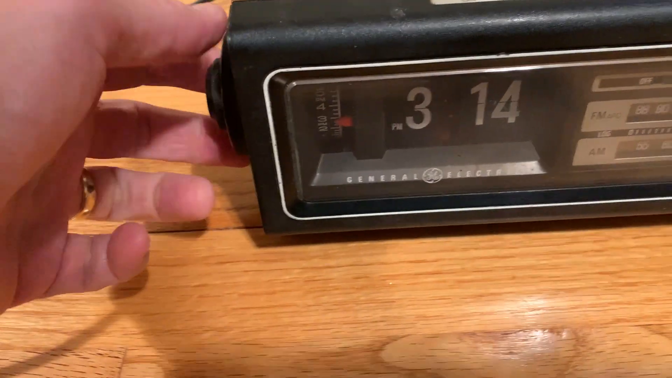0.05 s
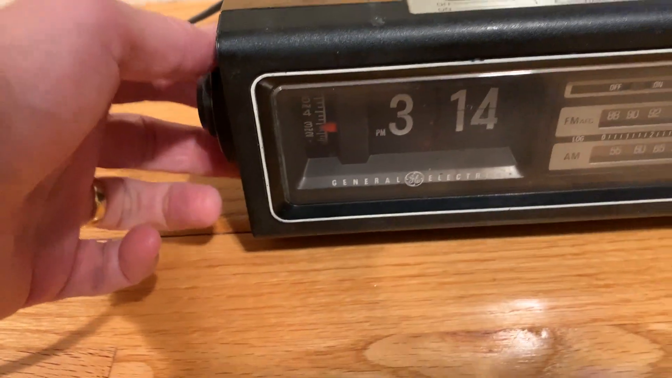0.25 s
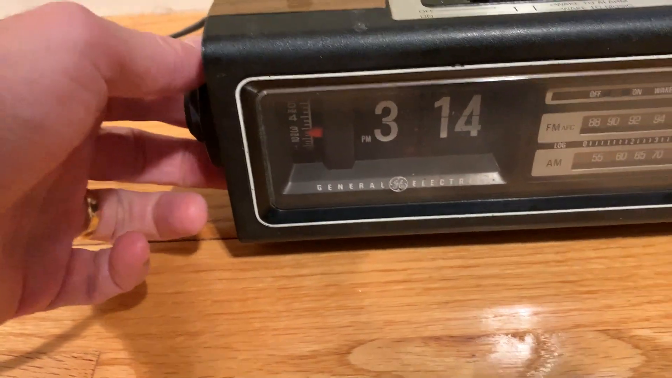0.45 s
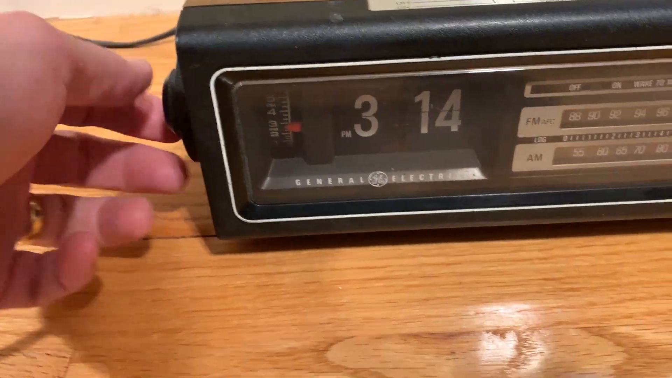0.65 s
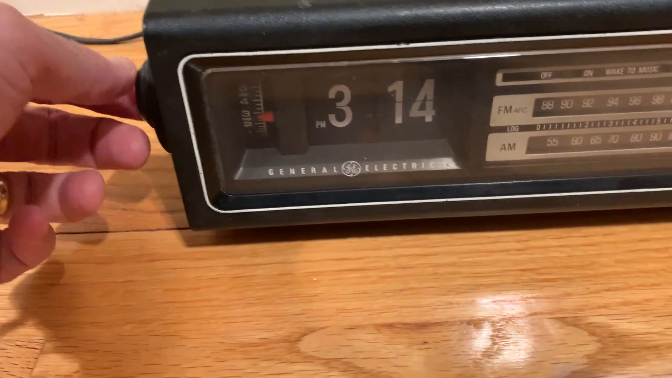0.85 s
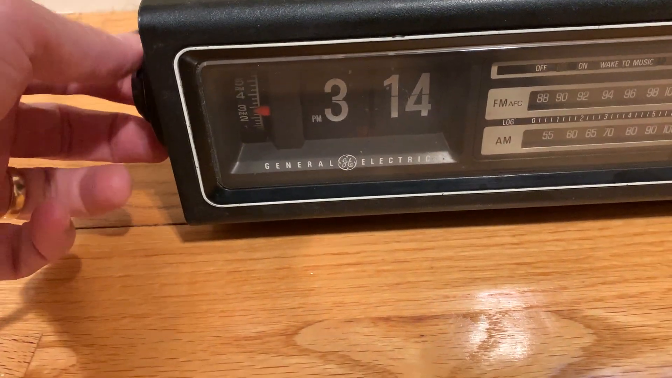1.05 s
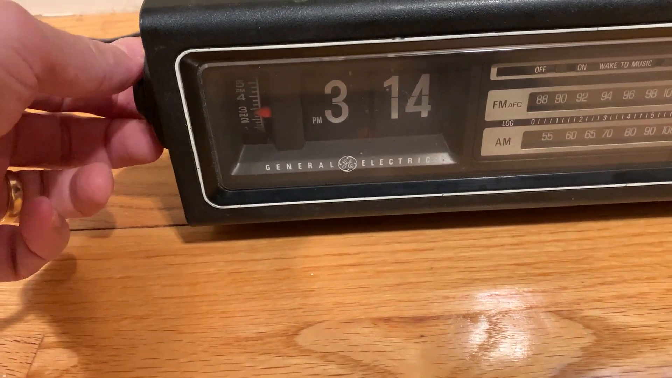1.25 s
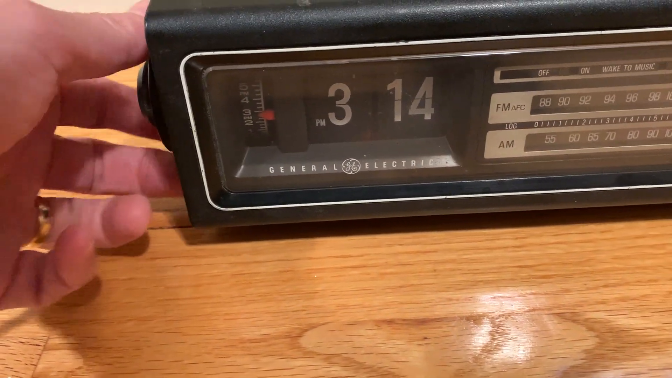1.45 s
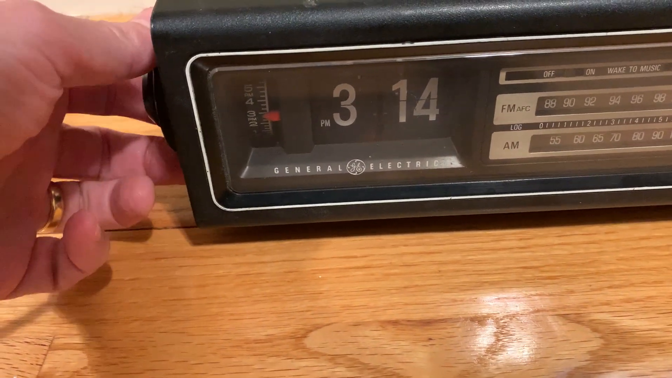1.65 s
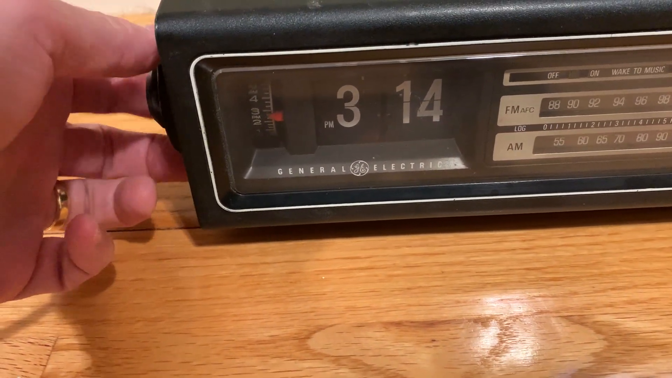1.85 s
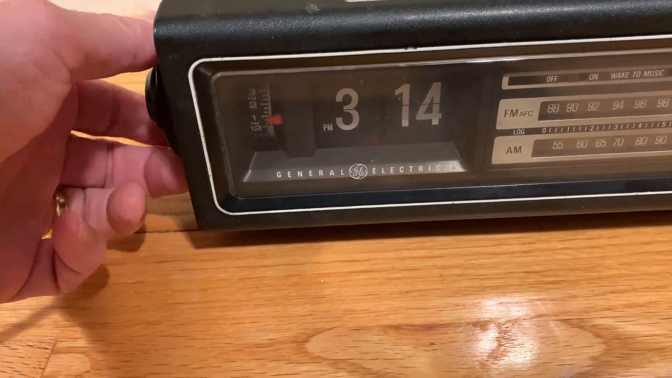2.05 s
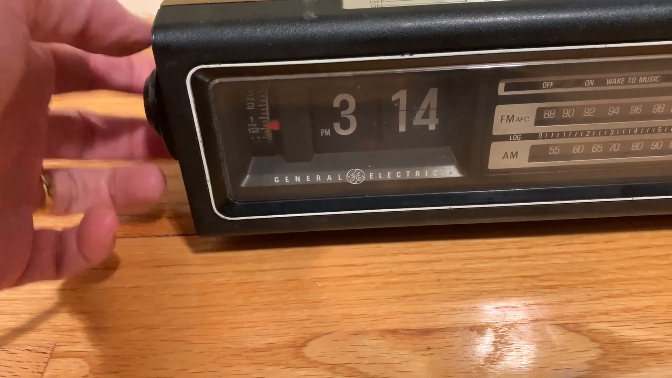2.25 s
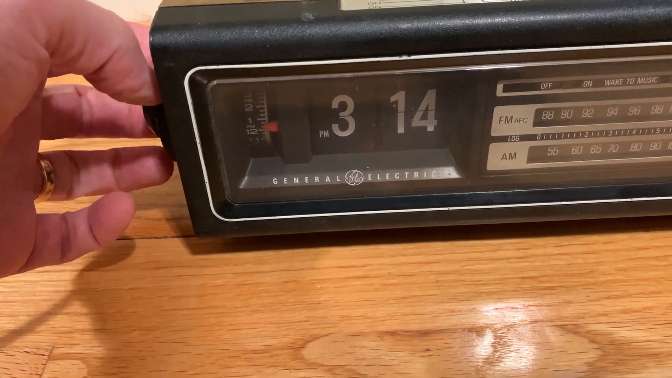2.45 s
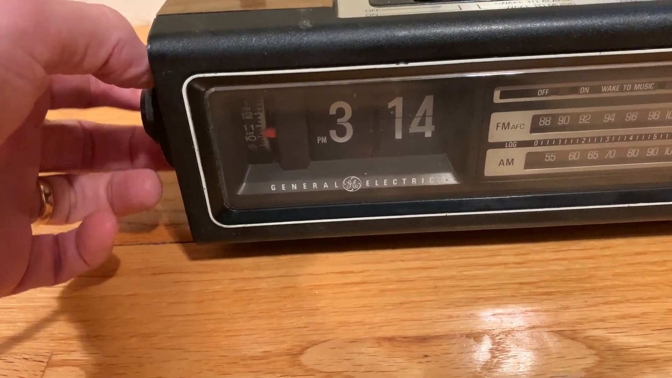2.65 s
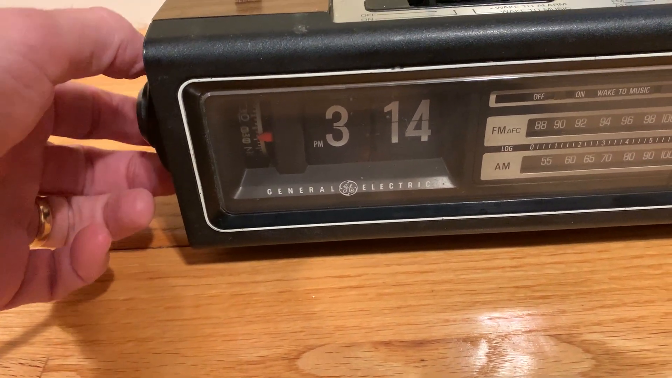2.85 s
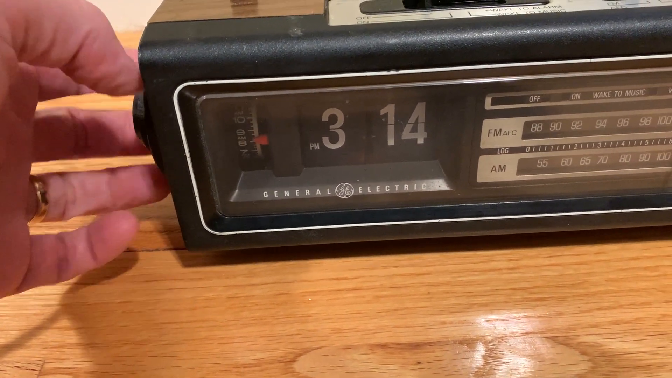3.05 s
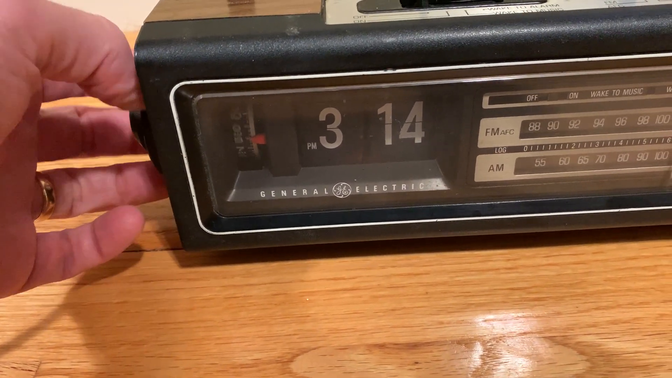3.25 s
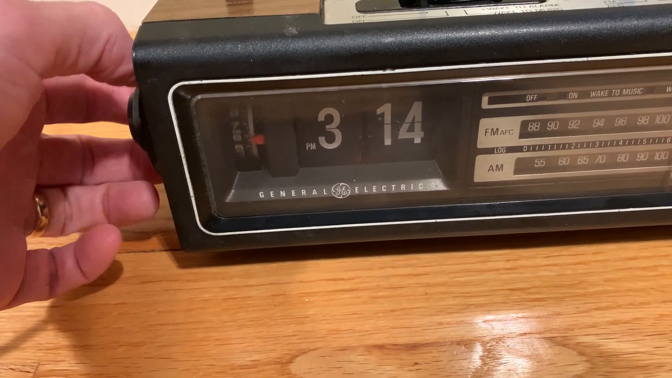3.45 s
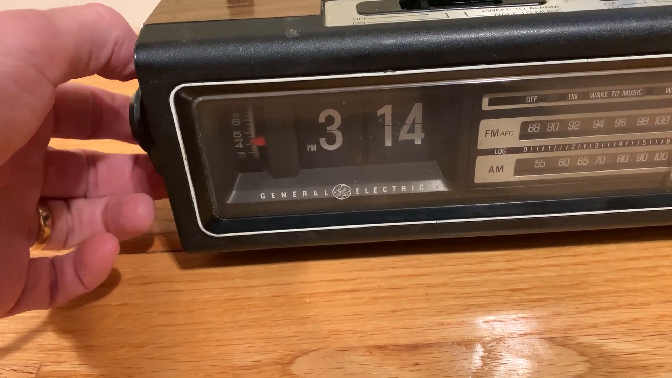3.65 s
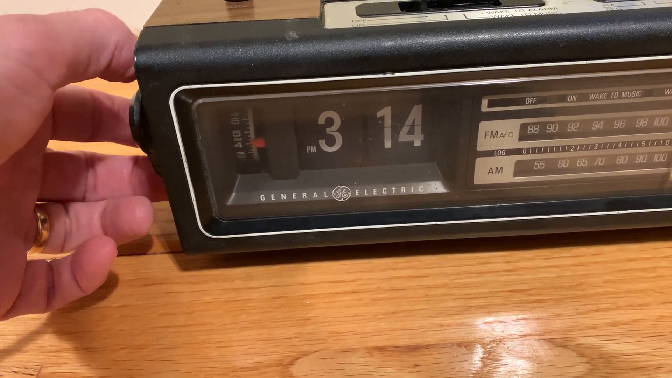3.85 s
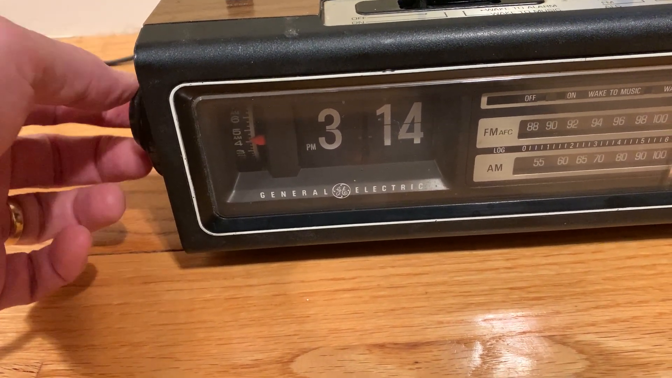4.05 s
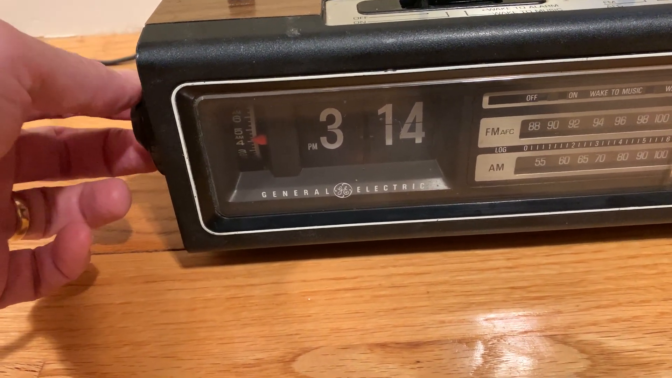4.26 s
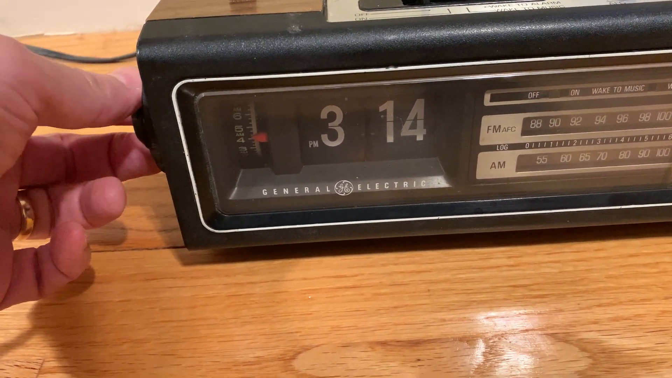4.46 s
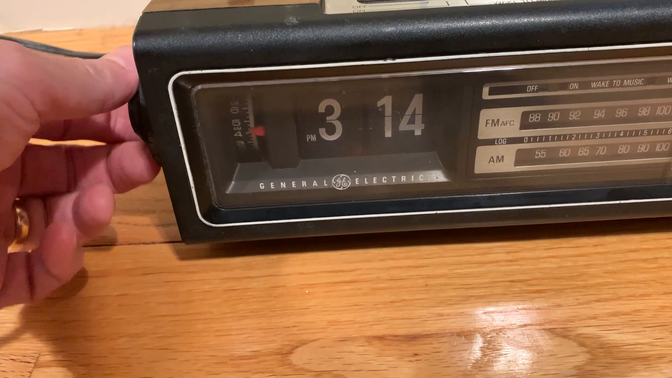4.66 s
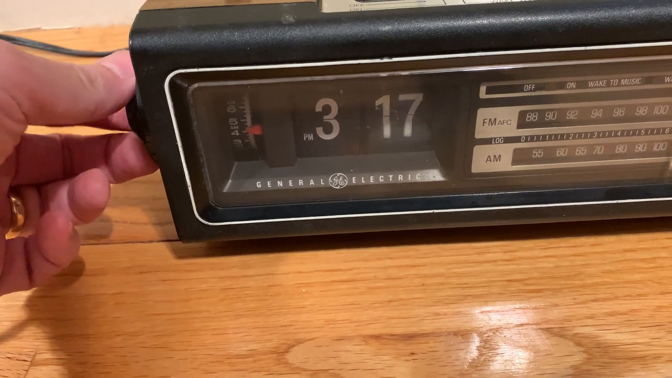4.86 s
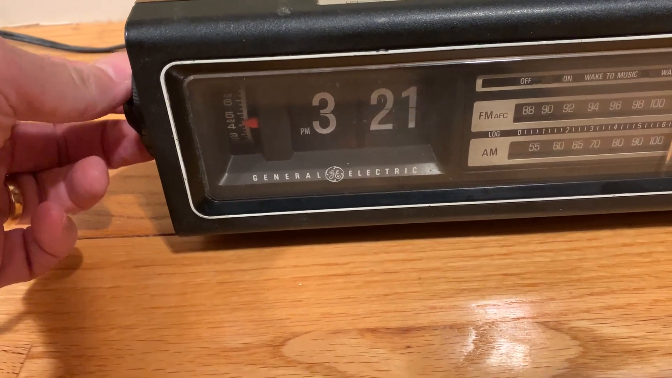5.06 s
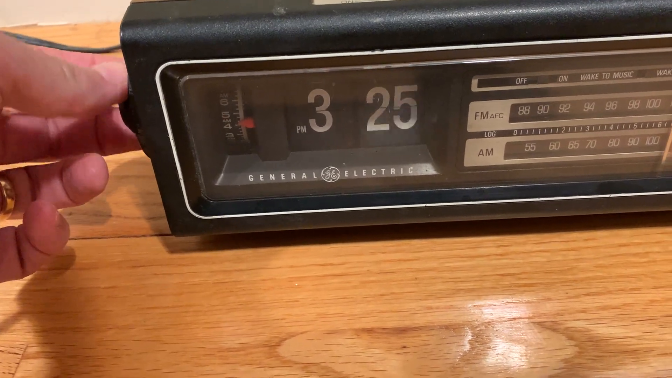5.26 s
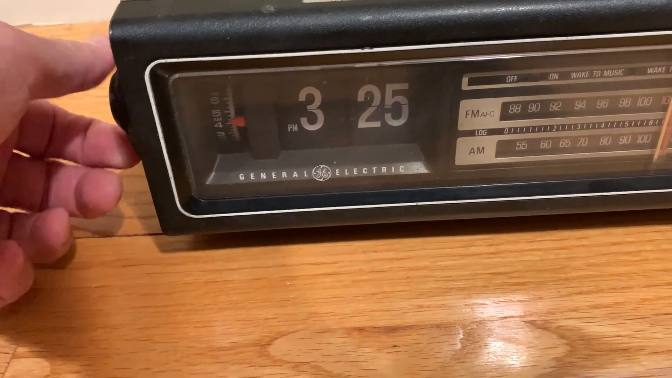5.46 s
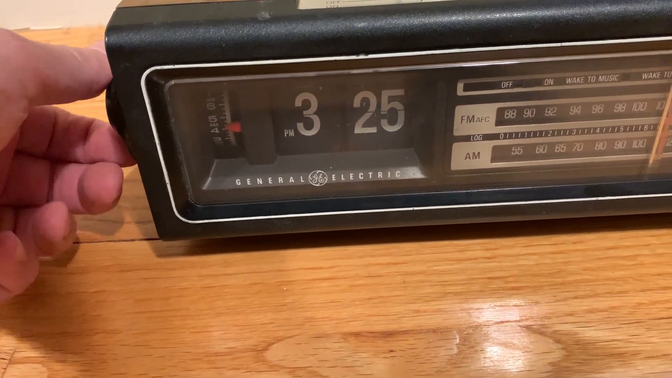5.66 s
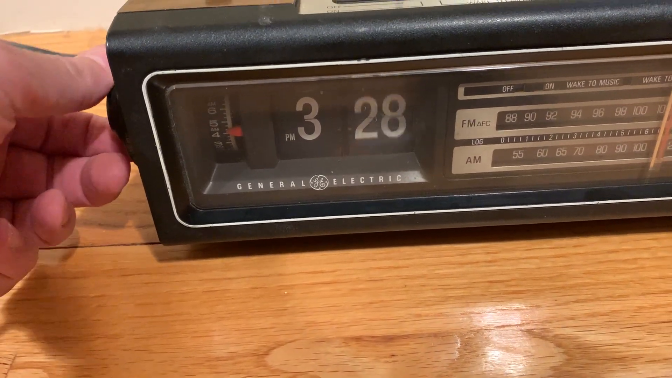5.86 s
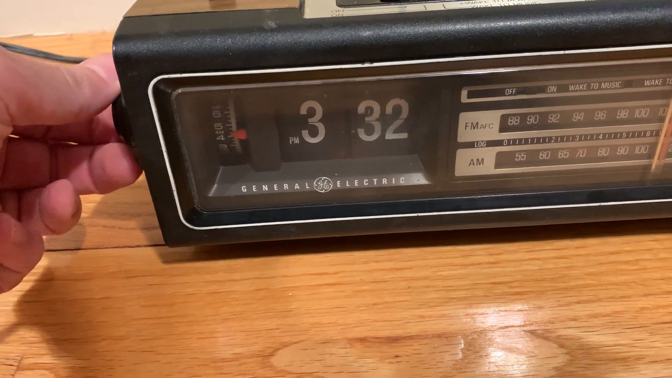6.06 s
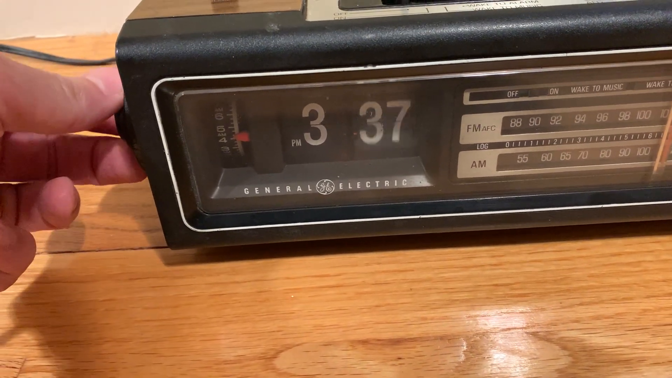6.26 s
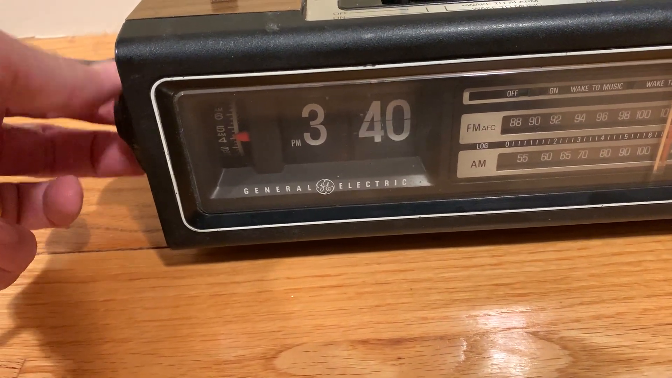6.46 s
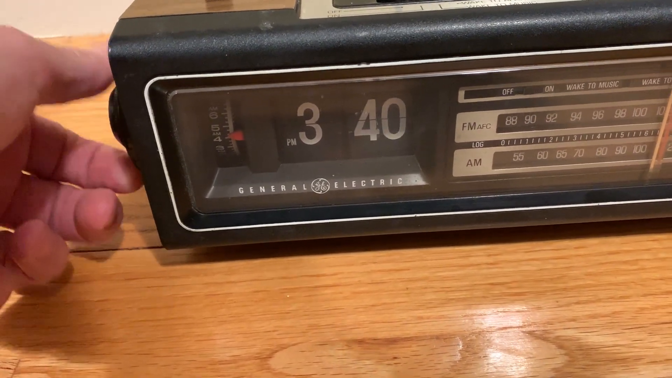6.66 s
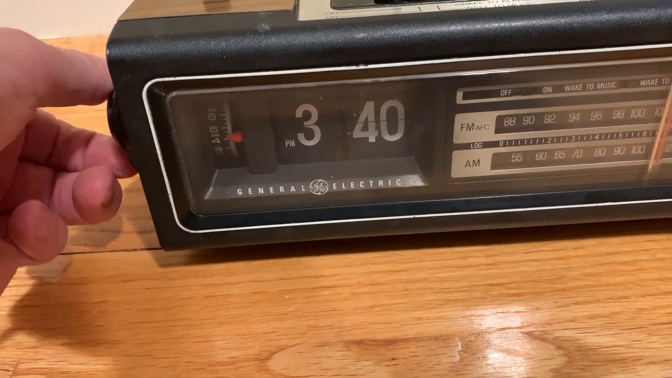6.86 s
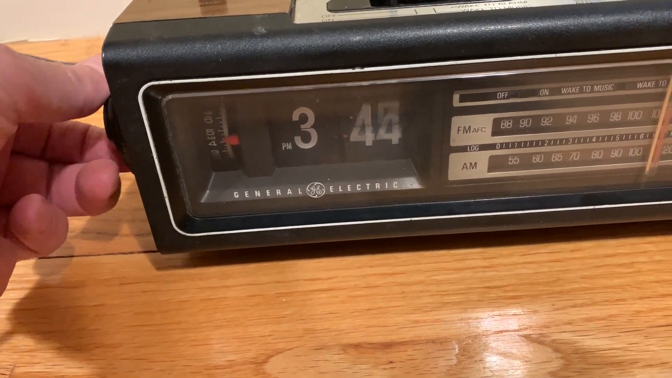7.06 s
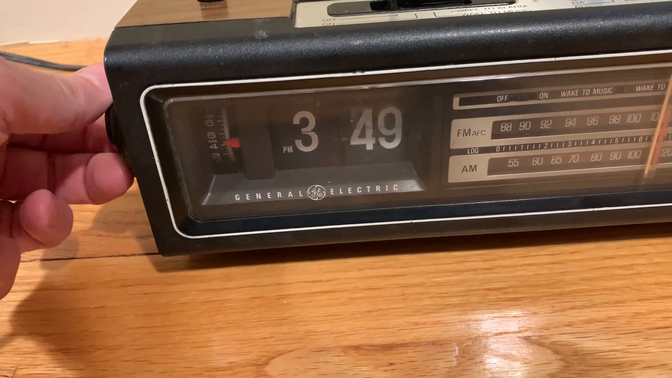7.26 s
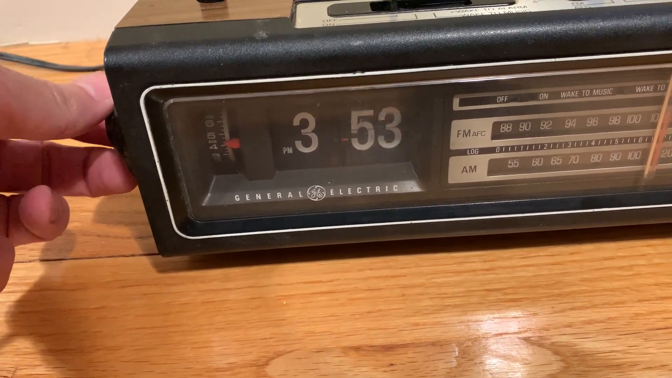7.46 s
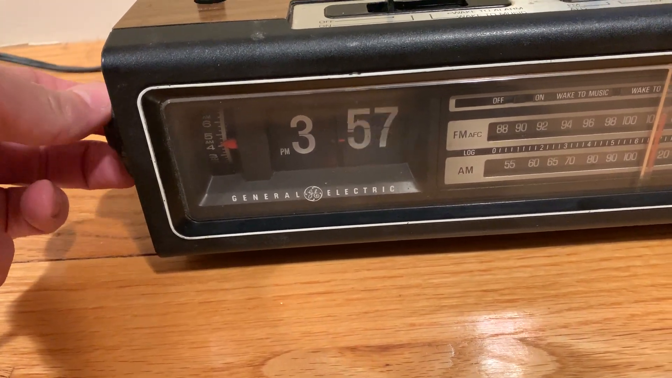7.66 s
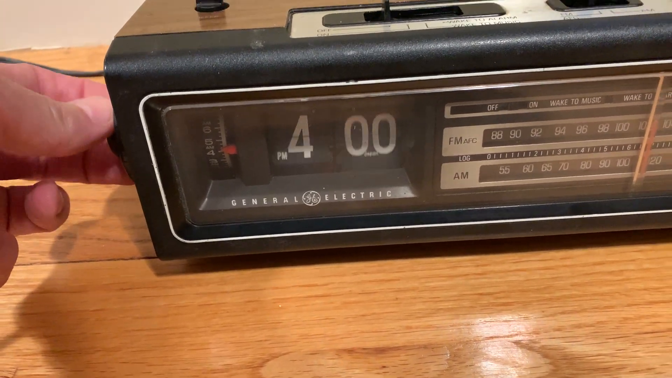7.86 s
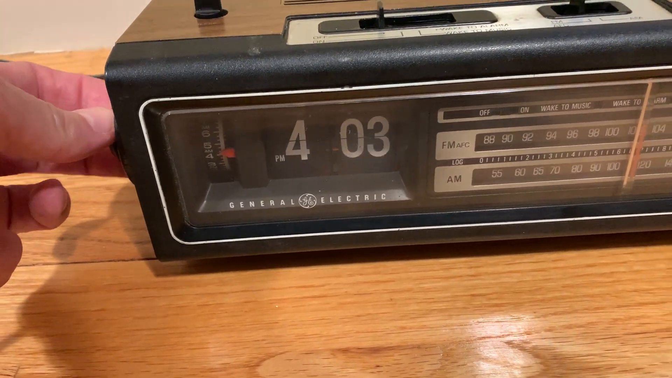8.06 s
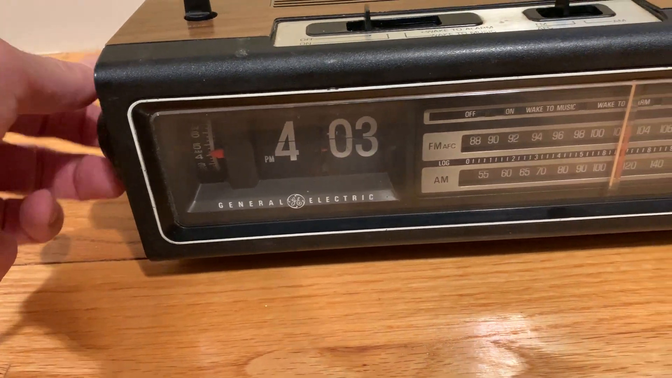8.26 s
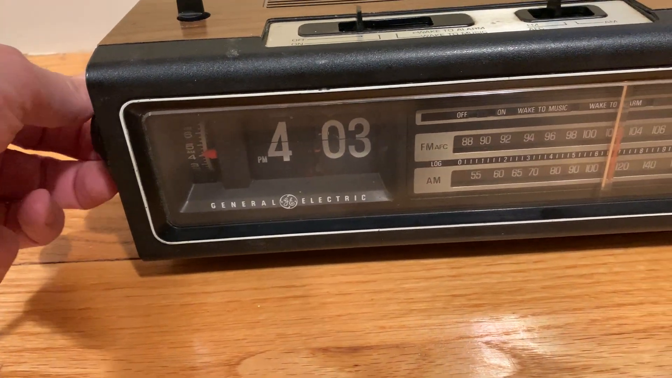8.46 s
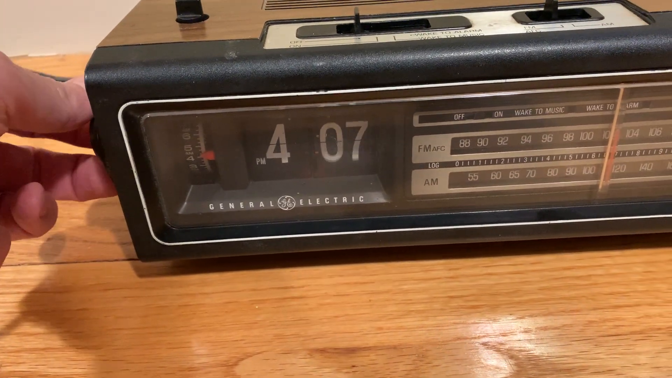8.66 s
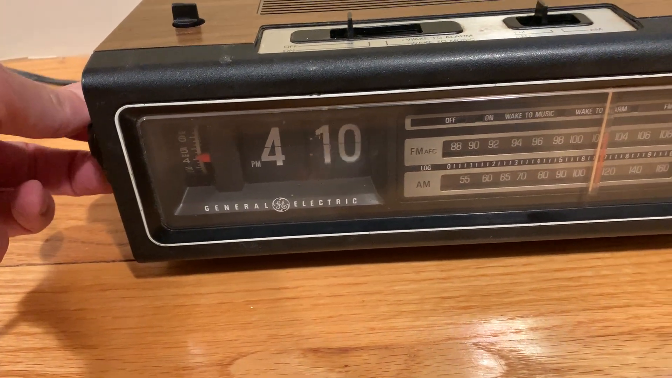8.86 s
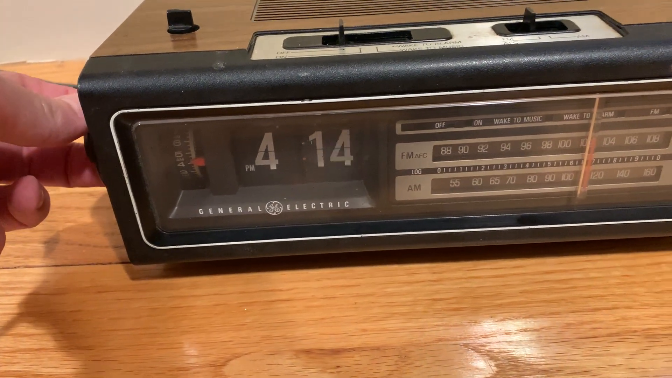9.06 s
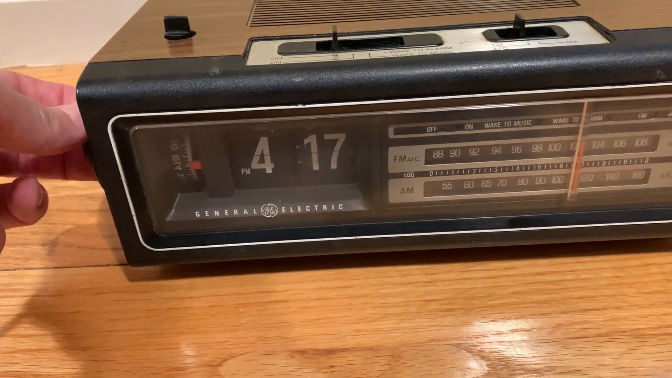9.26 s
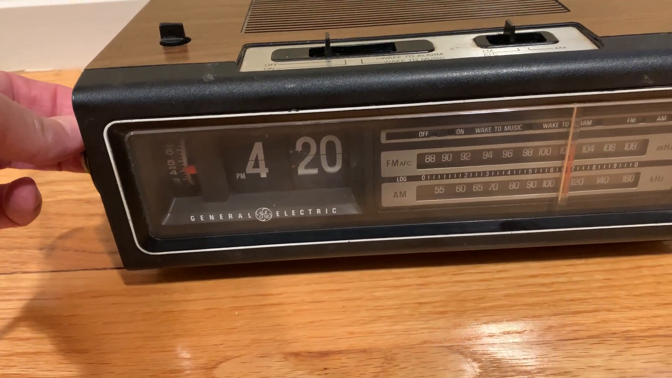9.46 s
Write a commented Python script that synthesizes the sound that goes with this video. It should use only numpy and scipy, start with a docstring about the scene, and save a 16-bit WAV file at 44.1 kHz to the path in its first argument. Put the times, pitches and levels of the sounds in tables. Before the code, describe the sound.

A hand handles an old plastic flip clock on a wooden floor. Soft finger knocks and faint skin rubs come first, then three quick zipping ratchet twists. After a pause, four bursts of sharp clicks follow, each click paired with a small card slipping and slapping down. Close stereo phone microphone, small lightly echoing room, low wavering rumble and faint hiss.

```python
"""Setting a flip clock

A hand sets an old flip clock on a wooden floor, close to a phone with two microphone ports.
Three twists of the alarm knob run a ratchet; then the time knob makes a pawl click and cards slip and slap down.
Every blow excites the modes of one plastic case; fingers rub and bump it, as grains of noise and soft knocks.
A small room answers with decaying noise, over a low rumble and faint hiss of filtered noise."""
import sys
import numpy as np
from scipy import signal
from scipy.fft import rfft, irfft
from scipy.io import wavfile
from scipy.ndimage import uniform_filter1d

SR = 44100
rng = np.random.default_rng(int(sys.argv[2]) if len(sys.argv) > 2 else 0)


def unload_audio(sound):
    """Save the sound as a 16-bit wav file, at the path given as the first command line argument."""
    columns = np.transpose(np.atleast_2d(sound))
    # keep every value between -1 and 1, then stretch to whole-number steps
    steps = np.round(np.clip(columns, -1, 1) * 32767)
    wavfile.write(sys.argv[1], SR, steps.astype(np.int16))


N = 419391

# strong modes of the case: (frequency [Hz], t60 [ms], build-up [ms], then the relative
# level [dB] when struck by tooth, pawl, slip, slap, rub, bump)
CASE = [(159, 160, 10, -11, -2, -9.5, -12.5, -44, 2), (270.3, 154, -2.5, -7, 7, 6.5, -4, -39, 0.5),
        (342.6, 54, 2, -8, -4, -3, -5, -44, -5), (400, 58, -1, -6, -4, -7, 3, -41.5, -23),
        (534.5, 100, 10, -6, -2, -12.5, -7.5, -47.5, -12.5), (626, 38, 4, -3, -3, -6.5, -7.5, -47.5, -22.5),
        (939, 85, -1.5, -11, -21.5, -32, -17.5, -38, -23),
        (1099, 19, 18.5, -14, -15.5, -24, -25.5, -44.5, -31.5),
        (1367, 38, 3, -8.5, -17, -16.5, -17, -37.5, -22.5),
        (1707, 10, 12, -19.5, -21, -25.5, -24, -36.5, -41),
        (2134.6, 31, 2.5, -9.5, -21.5, -3.5, -22.5, -36, -36.5),
        (2228, 30, 9.5, -8.5, -10.5, 1, -29, -31.5, -40),
        (3323, 9.3, 0.94, -19, -7.5, -16.5, -16.5, -48.5, -50),
        (3546, 18, 4.9, -16.5, -12.5, -38.5, -5, -42.5, -46.5),
        (3670, 25, 1.55, -15.5, -4, -17.5, 2, -39.5, -37),
        (4480, 24, -0.5, -14.5, -10, -18, -9, -32.5, -45),
        (5348, 21, 0.5, -14, -15, -27.5, -17.5, -33, -40.5), (5840, 35, 2, -12, -5.5, -9.5, -1, -30.5, -40),
        (6256, 30, -12, -17.5, -7.5, -26.5, -14, -24.5, -29.5),
        (6723, 19, 1.5, -16.5, -4, -8, -1, -38, -43), (7476, 17, -4, -16.5, -12.5, -16, -31.5, -23, -34.5),
        (8060, 11.2, -0.5, -6, 4, 9, 2, -22.5, -39.5), (8630, 15.4, -1, -4, -1, -11, -6, -12.5, -34.5),
        (9416, 17, 0.5, -9.5, -5.5, -5.5, -2, -24, -37),
        (10640, 18, 1, -7.5, -11.5, -21.5, -19, -31, -39.5),
        (11290, 12.8, 0.5, 0.5, -9, -15.5, -10, -33.5, -45),
        (11880, 22, 0.5, -8, -3.5, -8.5, -12.5, -27, -43.5), (12740, 4, -13, -9.5, -7, -29, -9, -50.5, -46),
        (13840, 54, -7.5, -17.5, 4.5, -9.5, -3, -44, -47),
        (14190, 12, -4, -7.5, -7.5, -13.5, -5, -36, -59.5),
        (14590, 20, -3, -12.5, -8, -15, -16, -30, -49.5),
        (14910, 26, -5, -23.5, -9, -19, -13.5, -43.5, -35)]
(CASE_HZ, CASE_T60_MS, CASE_RISE_MS,
 TOOTH_MODES_DB, PAWL_MODES_DB, SLIP_MODES_DB, SLAP_MODES_DB, SKIN_MODES_DB, BUMP_MODES_DB) = np.transpose(CASE)
# minor modes [Hz], scattered, denser towards the bass
MINOR_HZ = 450 + 15800 * (np.arange(1, 100) * (np.sqrt(5) - 1) / 2 % 1) ** 1.6
# phase by which the case reaches the left port first, struck at either knob: (frequency [Hz], phase [rad])
LEAD_ALARM = [(600, 0.12), (945, 0.54), (1110, .01), (1400, 2.214), (2170, 0.29), (3320, 2.88), (3700, 5.8),
              (4500, 3.88), (5800, 4.42), (6800, 2 * np.pi)]
LEAD_DRUM = [(600, 0.37), (945, 1.9), (1110, 1.2), (1400, 2.1), (2170, 1.46), (3320, 5.08), (3700, 4.05),
             (4500, 4.362), (5800, 8.05), (6800, 2 * np.pi)]
# each kind of blow, here the pawl: (gain [dB], contact [ms], rattle decay [ms], rattle level [dB],
# bounce delay [ms], bounce level [dB], minor modes [dB])
PAWL = (5, -0.0156, 1.84, -11.5, 2.5, -3.5, -7)


def undb(db):
    """Amplitude ratio: every 20 dB is a factor of ten."""
    return 10 ** (np.asarray(db) / 20)


def on_log(hz, table):
    """Logarithmic pitch axis: interpolate (frequency [Hz], value) points evenly per octave."""
    points_hz, values = np.transpose(table)
    return np.interp(np.log(np.maximum(hz, 1)), np.log(np.maximum(points_hz, 1)), values)


def ports(count):
    """Diffuse-field coherence: spectra of two noises, alike only as far as both ports hear the same."""
    # likeness of the two ports: (frequency [Hz], likeness [0-1])
    likeness = [(60, 1), (400, 0), (950, 0.59), (1400, 0.01), (6000, 0.1), (9000, 0.5), (13000, 0)]
    hz = np.arange(count // 2 + 1) * SR / count
    alike = np.clip(on_log(hz, likeness), 0, 1)
    weights = np.sqrt([(1 + alike) / 2, (1 - alike) / 2])
    mid, side = rfft(rng.standard_normal((2, count))) * weights
    return hz, np.array([mid + side, mid - side])


def air():
    """Filtered noise: a low rumble of the house that swells and wavers, under a steady faint hiss."""
    # spectrum of rumble and hiss: (frequency [Hz], relative level [dB per Hz])
    spectrum = [(15, -55.5), (25, -39), (49, -1.5), (124, -3), (167, -7), (245, -26.5), (360, -28.5),
                (397, -20.5), (435, -26), (520, -37), (831, -39), (1180, -42), (1320, -53), (1550, -52),
                (2600, -62.5), (15200, -67), (16500, -69.5)]
    # swell of the rumble: (time [s], level [dB])
    swell = [(0.0, -47), (0.74, -49.5), (1.11, -46.5), (1.32, -48), (1.91, -46), (2.59, -48), (2.89, -45.5),
             (4.08, -46.5), (5.06, -44), (5.75, -47.5), (5.96, -44), (6.7, -50), (7.36, -43.5),
             (7.63, -46.5), (8.16, -48.5), (8.48, -46), (8.84, -48), (9.51, -47)]
    waver_db, waver_per_s = 0.5, 5.7
    hz, noise = ports(count=N)
    noise = noise * undb(on_log(hz, spectrum))
    low_share = 1 / (1 + (hz / 220) ** 4)
    low = irfft(noise * low_share, N)
    high = irfft(noise * (1 - low_share), N)
    t = np.arange(N) / SR
    waver = np.interp(t * waver_per_s, np.arange(200), rng.standard_normal(200))
    low_db = np.interp(t, *np.transpose(swell)) + waver_db * waver
    return (low * undb(low_db) + high * undb(-40)) / low.std()


def ring(strike_db, minor_db, lead):
    """Modal superposition: the case's answer to one push, at the left port, right port and walls."""
    minor_t60_share = 0.68  # t60 of the minor modes as a share of their neighbours'
    far_peaks_db = -7  # the strong modes beam towards the front, so the walls hear less of them
    strong = np.arange(len(CASE_HZ) + len(MINOR_HZ)) < len(CASE_HZ)
    # many minor modes lie between the strong ones and take after their neighbours
    t60_ms, rise_ms, db = (np.r_[v, np.interp(MINOR_HZ, CASE_HZ, v)]
                           for v in (CASE_T60_MS, CASE_RISE_MS, strike_db))
    t60_ms = t60_ms * np.where(strong, 1, minor_t60_share)
    db = db + np.where(strong, 0, minor_db)
    hz = np.r_[CASE_HZ, MINOR_HZ][:, None]
    ms = np.arange(int(.15 * SR)) * 1000 / SR
    # large panels take time to start; no mode builds up faster than 0.22 ms
    build_up = (1 - np.exp(-ms / np.maximum(rise_ms, .22)[:, None])) ** 2
    envelope = np.exp(-np.log(1000) * ms / t60_ms[:, None]) * build_up
    # the area under each envelope sets its spectral height; signs alternate from mode to mode
    signs = (-1) ** np.arange(len(db))
    envelope *= (signs * undb(db) / envelope.sum(axis=1))[:, None]
    turn = 2 * np.pi * hz * ms / 1000
    half_lead = on_log(hz, lead) / 2
    left = envelope * np.sin(turn + half_lead)
    right = envelope * np.sin(turn - half_lead)
    walls = undb(far_peaks_db * strong) @ left
    out = np.array([left.sum(axis=0), right.sum(axis=0), walls])
    return out / np.abs(out).max()


def blows(events, kind, strike_db, lead):
    """Impact excitation: a push, one bounce and a dying rattle of tiny contacts, convolved with the case."""
    gain_db, contact_ms, rattle_ms, rattle_db, bounce_ms, bounce_db, minor_db = kind
    rattle_thin = 0.38  # share of its running mean taken out of a rattle
    ms = np.arange(int(.04 * SR)) * 1000 / SR
    noise = rng.standard_normal((len(events), len(ms)))
    force = undb(rattle_db) * np.exp(-ms / rattle_ms) * noise
    # tiny contacts are too quick to move the large panels
    force -= rattle_thin * uniform_filter1d(force, size=25, axis=1)
    # every rattle carries the same energy for its blow
    size = np.linalg.norm(force, axis=1, keepdims=True)
    force *= size.mean() / size
    force[:, 0] += 1
    force[:, int(bounce_ms * SR / 1000)] += undb(bounce_db)
    push = np.zeros(N + len(ms))
    for (s, db), one_force in zip(events, force):
        i = int(s * SR)
        push[i:i + len(ms)] += undb(db + gain_db) * one_force
    # a softer contact spreads the force in time and dulls the blow
    keep = np.exp(-1000 / SR / max(contact_ms, .002))
    push = signal.lfilter([1 - keep], [1, -keep], push)
    return signal.fftconvolve(push[None], ring(strike_db, minor_db, lead), axes=1)[:, :N]


def bumps():
    """Local excitation: each finger knock favours the modes near its own panel's pitch."""
    # fingers knocking the case: (time [s], level before the gain [dB], nearest panel [Hz])
    knocks = [(0.028, -40, 270), (0.087, -37.5, 280), (1.03, -38, 280), (1.654, -33, 189),
              (1.678, -39, 268), (1.742, -28.5, 189), (2.973, -30, 216), (3.245, -44, 480),
              (4.721, -47.5, 400), (6.712, -28, 344), (6.78, -46, 202)]
    # a bump, with the columns of PAWL
    kind = (3, 0.48, 7, -29, 9.5, -4, -7)
    focus_db = 11  # loss of a mode one octave away from the panel, at most twice that
    out = 0
    for s, db, panel_hz in knocks:
        loss_db = focus_db * np.minimum(np.log2(CASE_HZ / panel_hz) ** 2, 2)
        out = out + blows([(s, db)], kind, BUMP_MODES_DB - loss_db, LEAD_ALARM)
    return out


def fingertip_ticks():
    """Impact excitation: light taps of a fingertip ring the case as a tooth does."""
    # taps: (time [s], level before the gain [dB])
    taps = [(0.038, -85), (1.029, -50), (1.727, -47.5), (3.228, -54), (3.244, -48.5), (4.414, -71),
            (4.723, -44), (6.712, -44.5), (8.195, -45), (8.482, -48)]
    # a tick, with the columns of PAWL
    kind = (4.5, 0.24, 5, -0.5, 1.5, -14.5, 3.5)
    return blows(taps, kind, TOOTH_MODES_DB, LEAD_ALARM)


def rub():
    """Stick-slip friction: grains of noise hiss in the small modes, and scuff in the middle ones."""
    # skin sliding on the knob: (full from [s], held [ms], bright hiss level [dB], dull scuff level [dB])
    strokes = [(0.042, 6.7, -56, -85), (0.14, 27, -76.5, -89.5), (0.3, 9.2, -69.5, -95.5),
               (0.436, 8.7, -65, -89), (0.536, 10, -73, -97.5), (0.972, 82, -71, -79),
               (1.11, 11.7, -64, -102), (1.25, 77, -92, -77), (1.538, 8.4, -59.5, -66),
               (1.652, 10, -79, -87), (1.74, 25, -54.5, -68.5), (2.49, 10, -76, -91.5),
               (2.535, 30, -74, -78), (3.24, 6.2, -70.5, -66), (3.946, 14, -64, -81),
               (4.088, 8.2, -85, -79), (4.412, 9.1, -72.5, -96), (4.58, 61, -64.5, -76.5),
               (4.72, 4.7, -56.5, -76), (5.57, 42, -80, -89.5), (5.73, 36, -71.5, -81.5),
               (6.712, 6.5, -76, -65), (6.792, 6.1, -65, -91), (8.2, 46, -67.5, -83), (8.3, 130, -65, -80),
               (8.483, 3.333, -61.5, -66), (8.54, 30, -79, -73)]
    rise_db_per_s, fall_db_per_s = 600, 355.5
    start, held_ms, hiss_db, scuff_db = np.transpose(strokes)[:, :, None]
    t = np.arange(0, N, 32) / SR
    # every stroke swells, holds and fades alike
    before = np.maximum(start - t, 0)
    after = np.maximum(t - start - held_ms / 1000, 0)
    stroke = undb(-rise_db_per_s * before - fall_db_per_s * after)
    middle_db = -14 * np.log2(CASE_HZ / 2600) ** 2
    out = 0
    for strike_db, db in ((SKIN_MODES_DB, hiss_db), (middle_db, scuff_db)):
        grain = rng.standard_normal(N) * undb(1.9 * rng.exponential(size=N))
        noise = signal.fftconvolve(grain[None], ring(strike_db, 1.5, LEAD_ALARM), axes=1)[:, :N]
        level = np.interp(np.arange(N) / SR, t, (undb(db) * stroke).sum(axis=0))
        out = out + noise / noise.std() * level
    return out


def even(times, db):
    """Regular mechanism: blows of one usual level, give or take a little chance spread."""
    scatter_db = 0.02
    return np.c_[times, db + scatter_db * rng.standard_normal(len(times))]


def alarm_ratchet():
    """Ratchet impacts: the teeth strike the case one by one as the alarm knob twists."""
    # teeth: (time [s])
    teeth = [1.9119, 1.9332, 1.9519, 1.9679, 1.9885, 2.0057, 2.0243, 2.0407, 2.0581, 2.0737, 2.0935, 2.1169,
             2.14, 2.1636, 2.5686, 2.5799, 2.5891, 2.5972, 2.605, 2.614, 2.6225, 2.6306, 2.6421, 2.657,
             2.6902, 2.7187, 2.7346, 2.7519, 2.7794, 2.8031, 2.8183, 2.8295, 2.8353, 2.847, 2.8566, 2.8683,
             2.8816, 2.898, 2.9177, 3.306, 3.32, 3.3309, 3.3408, 3.351, 3.3633, 3.3732, 3.3832, 3.3914,
             3.4021, 3.418, 3.4553, 3.4816, 3.497, 3.515, 3.5434, 3.5769, 3.5959, 3.6135, 3.6277, 3.6432,
             3.671, 3.702, 3.7483]
    # a tooth, with the columns of PAWL
    kind = (6.5, 0.0259, 4, -10.5, 0.5, 4, -6.5)
    return blows(even(teeth, -25.5), kind, TOOTH_MODES_DB, LEAD_ALARM)


def pawl_clicks():
    """Pawl impacts: clicks of even strength ring the case as the time knob turns."""
    # clicks: (time [s])
    clicks = [4.8255, 4.894, 4.9553, 5.037, 5.104, 5.1796, 5.2486, 5.7723, 5.8739, 5.9372, 5.9913, 6.056,
              6.1597, 6.226, 6.2848, 6.3387, 6.389, 6.948, 7.0238, 7.0783, 7.1352, 7.1918, 7.2537, 7.3184,
              7.4002, 7.4688, 7.5526, 7.6454, 7.7133, 7.8026, 7.889, 7.9909, 8.0932, 8.6063, 8.6689, 8.7554,
              8.8639, 8.948, 9.022, 9.0867, 9.1645, 9.2757, 9.3643, 9.482]
    return blows(even(clicks, -25.5), PAWL, PAWL_MODES_DB, LEAD_DRUM)


def gears():
    """Poisson-like chance: loose gears tick faintly at random while the time knob turns."""
    # turns of the time knob: (from [s], to [s])
    twists = [(4.83, 5.28), (5.78, 6.41), (6.95, 8.09), (8.575, 9.5)]
    ticks_per_s = 30
    least_db, scatter_db = -44.5, 2.5  # weakest tick before the pawl's gain, mean excess over it
    chance = rng.random((int(ticks_per_s * N / SR), 2))
    s = chance[:, 0] * N / SR
    db = least_db - scatter_db * np.log(1 - chance[:, 1])
    turning = sum((s > a) & (s < b) for a, b in twists) > 0
    return blows(np.c_[s, db][turning], PAWL, PAWL_MODES_DB, LEAD_DRUM)


def falling_cards():
    """Release and impact: each card slips off its catch, falls and slaps down."""
    # cards: (slap time [s], slap level before the gain [dB], fall [ms], slip level before the gain [dB])
    cards = [(4.8592, -25.5, 12, -31), (4.9257, -25, 8.9, -33.5), (4.9986, -24.5, 13.7, -35),
             (5.0687, -24, 11.7, -34.5), (5.145, -25, 9.8, -32), (5.2202, -26, 12.2, -30.5),
             (5.278, -25.5, 12.3, -36), (5.8124, -24, 19.3, -34.5), (5.9096, -24.5, 14.5, -34.5),
             (5.9626, -24, 10.4, -32.5), (6.0203, -23, 7.3, -34), (6.1162, -25, 20.7, -30),
             (6.1996, -24.5, 12, -31), (6.2589, -25, 13.6, -32.5), (6.3109, -26, 10.5, -30),
             (6.3648, -26.5, 10, -31.5), (6.4085, -25.5, 9.1, -32), (6.9884, -26, 21.54, -31),
             (7.0511, -26.5, 12.56, -32), (7.1098, -25, 14, -30.5), (7.1643, -24.5, 11.6, -30),
             (7.2237, -24, 12.8, -31), (7.2849, -24.5, 14, -29.5), (7.3638, -25, 20.5, -31.5),
             (7.4342, -25, 13.3, -31.5), (7.5099, -26.5, 17.4, -31.5), (7.606, -26.5, 15.1, -31),
             (7.6846, -25.5, 13.3, -31), (7.7661, -27, 16.8, -31), (7.8379, -26.5, 17, -31),
             (7.9395, -26.5, 12.3, -32), (8.0414, -27.5, 13.8, -29.5), (8.5803, -28.5, 13.2, -32.5),
             (8.6367, -27, 9.6, -32), (8.7118, -26, 14.7, -32.5), (8.8156, -26.5, 22, -32.5),
             (8.9122, -29, 12, -33.5), (8.9861, -27.5, 13.6, -31.5), (9.0571, -28, 10.4, -30.5),
             (9.1212, -27, 13, -32.5), (9.213, -27, 10.8, -32), (9.3233, -26.5, 9.8, -32.5),
             (9.4212, -25.5, 7.2, -36.5)]
    # a slip and a slap, with the columns of PAWL
    slip = (6, -0.95, 4.5, -10.5, 5, -11.5, 1)
    slap = (5, -0.08, 1.5, -10.5, 5, -7, -4.5)
    slap_s, slap_db, fall_ms, slip_db = np.transpose(cards)
    slips = blows(np.c_[slap_s - fall_ms / 1000, slip_db], slip, SLIP_MODES_DB, LEAD_DRUM)
    slaps = blows(np.c_[slap_s, slap_db], slap, SLAP_MODES_DB, LEAD_DRUM)
    return slips + slaps


def room(x):
    """Reverberation: a noise tail for each port, each band dying exponentially at its own rate."""
    # bands of the tail: (centre [Hz], t60 [s], relative level [dB])
    bands = [(323, 0.61, -17), (1060, 0.39, -18), (2530, 0.4, -22.5), (5900, 0.34, -24),
             (11630, .22, -35.5)]
    t = np.arange(int(.6 * SR)) / SR
    hz, noise = ports(count=len(t))
    centres = np.array(bands)[:, 0]
    tail = 0
    for k, (_, t60, db) in enumerate(bands):
        share = on_log(hz, np.c_[centres, np.arange(len(bands)) == k])
        decay = np.exp(-np.log(1000) * t / t60)
        tail = tail + undb(db) * irfft(noise * share, len(t)) * decay * np.sqrt(1000 / SR)
    # the walls' answer builds up over the first few milliseconds
    tail = tail * np.clip(t / 0.0042, 0, 1)
    return signal.fftconvolve(x[None], tail, axes=1)[:, :N]


def scene():
    """Superposition: clock and fingers close by, their echo, and the air of the room."""
    fingers = bumps() + fingertip_ticks() + rub()
    clock = alarm_ratchet() + pawl_clicks() + gears() + falling_cards()
    left, right, walls = fingers + clock
    return np.array([left, right]) + room(walls) + air()


def record(dry):
    """Linear filtering: the phone shifts its channels in time, thins the deepest bass and cuts the top steeply."""
    # left minus right channel: (frequency [Hz], level [dB])
    left_gain = [(60, -2.6), (160, -2.1), (270, -.5), (450, -1.8), (950, -.3), (2200, -1.1), (5800, -1.8),
                 (9000, -.2), (13000, 0)]
    # phase shift of the left channel's treble: (frequency [Hz], phase [rad])
    treble_lead = [(5800, 0), (6800, .8), (8200, -2.4), (9400, -4.7), (11400, -8.8), (13500, -12.6),
                   (14600, -15.3), (15800, -16.2), (16500, -19)]
    # lag of the right channel's bass: (time [s], lag [ms])
    bass_lag = [(0, 1.08), (.9, 0.93), (1, 0), (2.71, 0.93), (2.76, 1.96), (6.8, 1.98), (7.0, 0)]
    bass_top_hz, top_hz = 746, 16100
    hz, at = np.arange(N // 2 + 1) * SR / N, np.arange(N)
    shift = np.exp(1j * on_log(hz, treble_lead))
    left = irfft(rfft(dry[0]) * undb(on_log(hz, left_gain)) * shift, N)
    bass = irfft(rfft(dry[1]) / (1 + (hz / bass_top_hz) ** 12), N)
    lag = np.interp(at / SR, *np.transpose(bass_lag)) * SR / 1000  # in samples
    right = dry[1] - bass + np.interp(at - lag, at, bass)
    high_pass = signal.butter(2, 45, "high", fs=SR, output="sos")
    low_pass = signal.ellip(8, .3, 75, top_hz, fs=SR, output="sos")
    both = signal.sosfilt(high_pass, np.array([left, right]))
    return signal.sosfilt(low_pass, both)


dry = scene()
out = record(dry)
unload_audio(out)
```